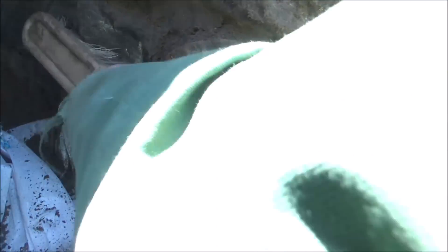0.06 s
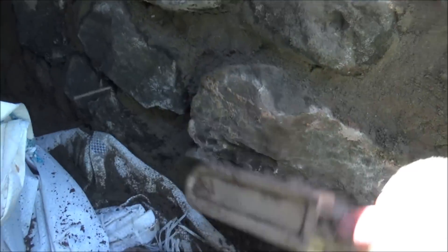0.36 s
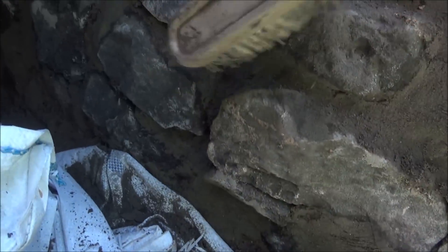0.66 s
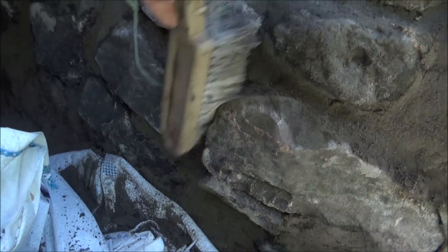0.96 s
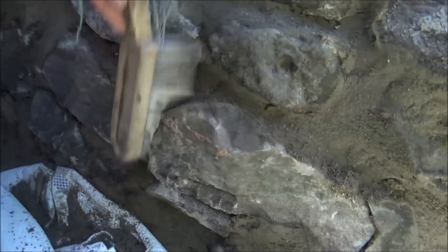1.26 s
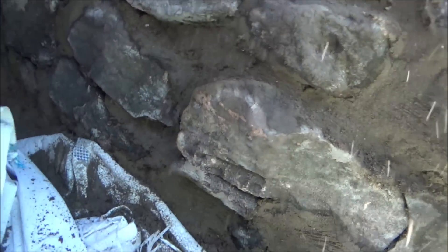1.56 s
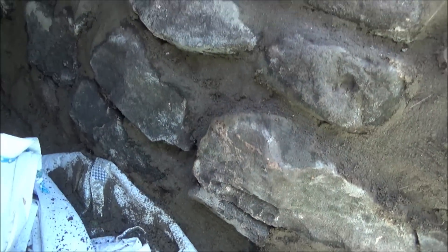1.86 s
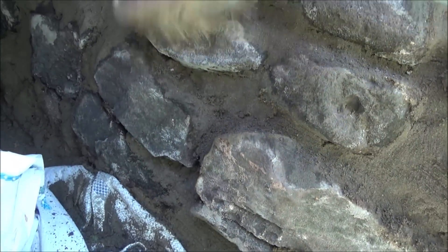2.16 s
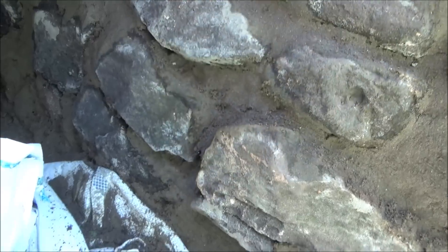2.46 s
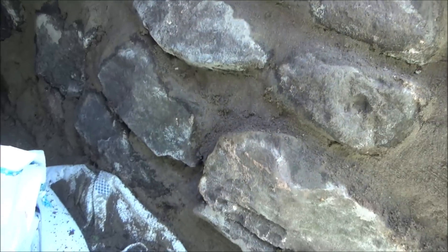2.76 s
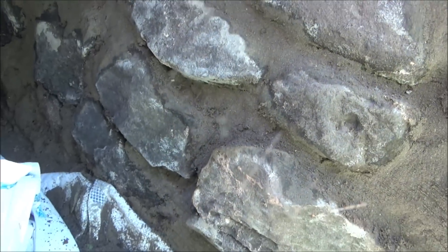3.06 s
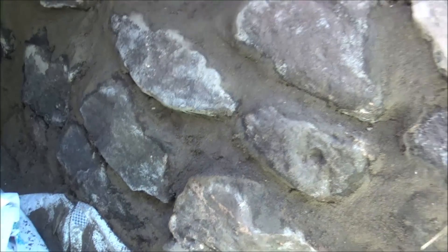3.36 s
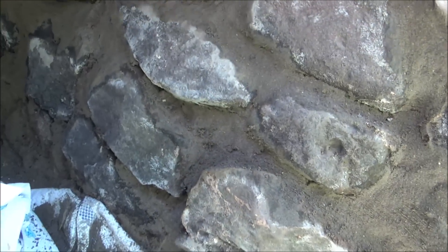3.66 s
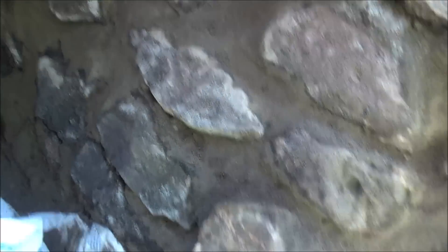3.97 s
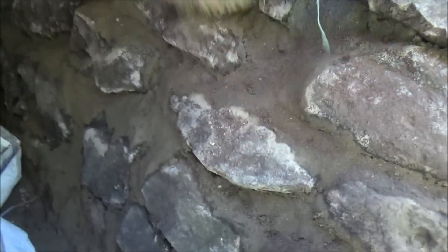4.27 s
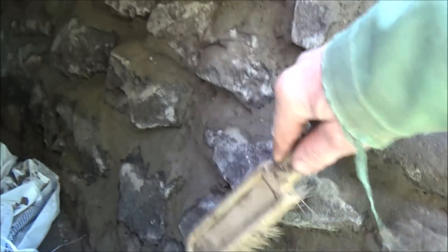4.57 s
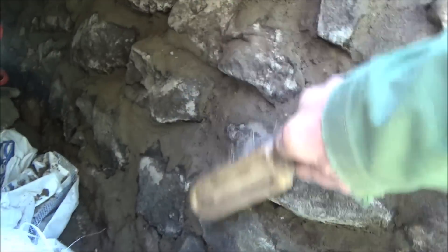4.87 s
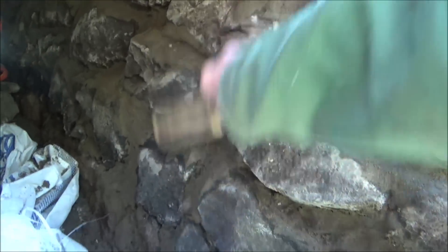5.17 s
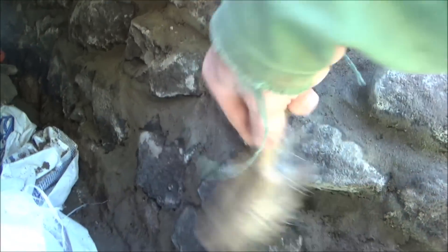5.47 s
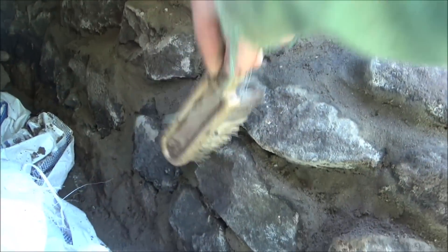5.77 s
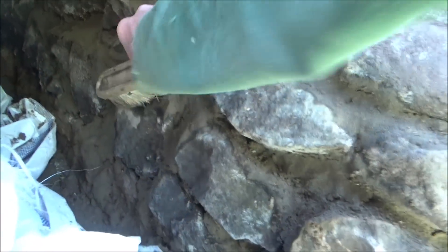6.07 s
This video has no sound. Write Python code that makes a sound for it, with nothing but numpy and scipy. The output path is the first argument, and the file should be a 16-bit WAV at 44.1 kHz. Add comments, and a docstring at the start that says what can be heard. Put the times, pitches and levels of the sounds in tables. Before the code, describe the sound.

A stiff hand brush scrubs wet cement from a stone wall in quick, scratchy strokes, its wooden block knocking on the stones.

```python
"""A stiff hand brush scrubs fresh cement from a stone wall; close walls answer, over a low distant drone.
From the start bristles flick, sand grinds, wet mortar crumbles and the wooden block knocks on stones.
In the first quarter second an arm bumps the microphone and its sleeve rubs across it.
From 0.9 s the tips now and then sing over smooth stone; from 1.4 s mortar squelches and crumbs drop.
The strokes go on to the end, at 6 s."""
import sys
import numpy as np
from scipy import signal
from scipy.fft import rfft, irfft
from scipy.io import wavfile
from scipy.ndimage import uniform_filter1d

SR = 44100
rng = np.random.default_rng(int(sys.argv[2]) if len(sys.argv) > 2 else 0)


def generate_wav(signal):
    """Clip the signal to [-1, 1] and save it as 16-bit WAV at the path in sys.argv[1]."""
    frames = np.transpose(np.atleast_2d(signal))
    scaled = np.clip(frames, -1, 1) * 32767
    pcm = np.round(scaled).astype(np.int16)
    wavfile.write(sys.argv[1], SR, pcm)


N = 269186
TIME = np.arange(N) / SR


def amp(db):
    """Decibels to gain."""
    return 10 ** (np.asarray(db) / 20)


def unit(x):
    """Scale to rms 1."""
    return x / np.sqrt(np.mean(x ** 2))


def add(track, time_s, sound):
    """Mix a sound in at a time."""
    start = max(int(time_s * SR), 0)
    track[start:start + len(sound)] += sound[:N - start]


def walk(rate_hz):
    """Random values joined by straight lines; spread near 1."""
    return np.interp(TIME * rate_hz, np.arange(N), rng.standard_normal(N)) * np.sqrt(3 / 2)


def resonate(x, hz, width_hz):
    """One resonance, gain 1 at its centre."""
    return signal.lfilter(*signal.iirpeak(min(hz, SR / 3), hz / min(width_hz, SR / 4), fs=SR), x)


def colour(x, spectrum, size=1024):
    """Minimum-phase filter through (Hz, dB) points."""
    hz, db = np.transpose(spectrum)
    bins_hz = np.fft.rfftfreq(size, 1 / SR) + 1
    log_gain = np.log(amp(np.interp(np.log(bins_hz), np.log(hz), db)))
    cepstrum = irfft(log_gain)[:size // 2]
    cepstrum[1:] *= 2
    return signal.oaconvolve(x, irfft(np.exp(rfft(cepstrum, size))))[:N]


def ticks(rate_hz, spread_db):
    """Random impacts of uneven size, at even power whatever their rate."""
    size = amp(spread_db * np.minimum(rng.exponential(size=N), 5)) * rng.choice([-1, 1], N)
    return unit((rng.random(N) < rate_hz / SR) * size / np.sqrt(rate_hz))


def grains(rate_hz, spread_db, low_hz, high_hz, q, count=14):
    """Impacts that each ring briefly at one of several pitches."""
    hits, pitch = ticks(rate_hz, spread_db), rng.integers(0, count, N)
    pitches_hz = np.geomspace(low_hz, high_hz, count)
    return sum(resonate(hits * (pitch == k), hz, hz / q) for k, hz in enumerate(pitches_hz))


def pops(rows, decay_cycles, glide, size=4096):
    """Damped rings that swell within a cycle and slide in pitch."""
    out, t = np.zeros(N), np.arange(size) / SR
    for time_s, db, hz in rows:
        turns = hz * t
        fade = np.exp(-turns / decay_cycles)
        phase = 2 * np.pi * turns * (1 + glide * (1 - fade))
        ring = np.sin(phase) * fade * (1 - np.exp(-2 * turns))
        add(out, time_s, amp(db) * ring / np.abs(ring).max())
    return out


def ramp(time_s, length_s):
    """Progress through a gesture, 0 to 1."""
    return np.clip((TIME - time_s) / length_s, 0, 1)


def press(time_s, length_s, attack_s, release_db_per_s):
    """Gain of a gesture: half on at its start, held for its length, then dying away."""
    release = amp(-release_db_per_s * np.clip(TIME - time_s - length_s, 0, 1))
    return ramp(time_s - attack_s / 2, attack_s) * release


# Drone spectrum (frequency [Hz], gain [dB])
DRONE_SPECTRUM = [(20, -20.5), (35, -26), (48, -6), (58, -4.5), (66, 1), (80, -7.5), (105, -12), (122, -6),
                  (150, -12), (250, -19), (500, -25), (1500, -30), (5000, -31), (12000, -52)]


def drone(level_db=-43.5):
    """A low wavering drone from far off, with faint outdoor air above it."""
    rumble = unit(colour(rng.standard_normal(N), DRONE_SPECTRUM, size=8192))
    return rumble * amp(level_db + 1.8 * walk(11))


# Pushes and drags of the brush
# (time [s], length [s], bristle level [dB], swell [dB], sand re bristles [dB], mortar level [dB])
BRUSH_STROKES = [(0.0,0.0077,-23,-4,0,-33.5), (0.047,0.095,-29.5,-4.5,-1.5,-35.5),
                 (0.163,0.065,-29.5,3.5,1,-35), (0.222,0.13,-21,0,1.5,-39), (0.388,0.11,-33,7.5,0,-55),
                 (.498,.29,-39.5,-6.5,1.5,-53), (0.85,0.047,-32,10,-2,-49), (0.901,0.025,-20,5,-5.5,-61),
                 (0.993,0.054,-25,7,-2,-40.5), (1.083,0.11,-28,0,-4.5,-42),
                 (1.234,0.042,-32,-2.5,1.5,-46.5), (1.287,0.22,-25,-6,-6.5,-49), (1.61,.07,-35.5,1,-6,-54),
                 (1.701,0.24,-33,-5.5,-1.5,-46.5), (1.909,0.074,-31.5,-1,1,-41),
                 (2.011,0.044,-35.5,-5,2,-56), (2.062,0.088,-24,5,-5,-46.5), (2.194,0.027,-21,3.5,-16,-51),
                 (2.28,0.11,-24.5,-2,-3,-40), (2.42,0.07,-20.5,5,-5.5,-39.5),
                 (2.535,0.14,-25,-15.5,-11,-46), (2.727,0.056,-21,4,-9,-45.5),
                 (2.811,0.15,-36,6.5,-12,-45.5), (2.937,.072,-23.5,-1.5,-8,-46),
                 (3.017,0.18,-29.5,5,-2,-49), (3.259,0.23,-31,-3,-6.5,-46.5),
                 (3.505,0.069,-22.5,-0.5,-13,-46.5), (3.577,0.12,-28,0,0,-41.5),
                 (3.699,0.16,-33.5,-5,-2.5,-45.5), (3.874,0.15,-26,4.5,-3,-36),
                 (4.039,0.067,-22,3,-16,-37.5), (4.147,0.039,-22.5,-2.5,-8,-42), (4.19,.21,-23,-1,-3.5,-39),
                 (4.431,0.18,-22,2,-16,-48), (4.635,0.068,-26,-2,-4.5,-42), (4.718,0.1,-24.5,-9,-7,-44),
                 (4.836,0.055,-20.5,1.5,-5.5,-48), (4.919,0.036,-22.5,1,-7,-46),
                 (4.986,0.098,-31.5,3,-10,-54), (5.099,0.079,-27.5,-5.5,-9,-48),
                 (5.184,0.051,-22.5,0.5,-8.5,-63), (5.25,0.11,-31,-4,-5,-49),
                 (5.35,0.087,-22.5,-4.5,-20,-48.5), (5.451,0.21,-32,-10.5,-8.5,-48),
                 (5.686,0.093,-41,-8,-15,-73), (5.873,.04,-29,-3,1,-63), (5.912,0.16,-24.5,-5.5,-4.5,-45)]


def strokes(rest_db=-47.5, rest_mortar_db=-54, arch_db=0.76):
    """Bristle, sand and mortar levels in dB: the tufts bend in, run fastest mid-stroke, spring off."""
    # a few tips trail on the wall between strokes
    bristle_power, sand_power, mortar_power = amp([rest_db, rest_db - 7, rest_mortar_db]) ** 2
    for time_s, length_s, db, swell_db, sand_db, mortar_db in BRUSH_STROKES:
        along = ramp(time_s, length_s) - 0.5
        arch = amp(-arch_db * (2 * along) ** 2)
        pressure = press(time_s, length_s, attack_s=0.036, release_db_per_s=340.5) * arch
        stroke = pressure * amp(db + swell_db * along)
        bristle_power += stroke ** 2
        sand_power += (stroke * amp(sand_db)) ** 2
        mortar_power += (pressure * amp(mortar_db)) ** 2
    return 10 * np.log10([bristle_power, sand_power, mortar_power])


def tuft_snaps(speed, settle_s=0.005):
    """Gain flutter as tufts snap free and settle; a fast stroke glides, a slow one catches."""
    snaps = signal.lfilter([1], [1, -np.exp(-1 / (settle_s * SR))], np.abs(ticks(130, spread_db=4)))
    depth = 0.19 * (1 - speed) ** 2 + 0.36
    return (1 + depth * unit(snaps)) / (1 + depth)


# Spectra of bristles, fine grit flung off the tips, and rolling sand (frequency [Hz], gain [dB])
BRISTLE_SPECTRUM = [(500, -22.5), (1500, -10.5), (3000, -4.5), (4200, 0.5), (5200, 2.5), (6300, -1),
                    (7500, -5), (8600, -13), (10000, -25), (12000, -33.5), (16000, -32)]
SPRAY_SPECTRUM = [(5000, -40), (7500, 10.5), (8800, 9.5), (10000, 9.5), (11500, 7.5), (14000, 2),
                  (16000, -5)]
SAND_SPECTRUM = [(300, -21), (800, -7), (1300, -7.5), (2000, 0), (2800, 4), (3800, 1), (6000, -52.5),
                 (12000, -45)]


def scrub(bristle_db, sand_db, full_speed_db=-20):
    """Bristles catch and flick free over rolling sand: single ticks when slow, a dense hiss when fast."""
    speed = np.minimum(amp(bristle_db - full_speed_db), 1)
    flicks = ticks(350 + 20000 * speed ** 1.4, spread_db=1)
    twangs = grains(250 + 3000 * speed, spread_db=2.2, low_hz=2300, high_hz=9000, q=16, count=28)
    bristles = unit(colour(flicks, BRISTLE_SPECTRUM))
    bristles = unit(bristles + 0.46 * unit(colour(twangs, BRISTLE_SPECTRUM)))
    flung = ticks(1500 + 16000 * speed, spread_db=-1.5)
    spray = unit(colour(flicks + 1.25 * flung, SPRAY_SPECTRUM)) * amp(-14.5 + 4 * speed)
    grit = grains(200 + 3500 * speed, spread_db=2, low_hz=900, high_hz=4200, q=5.4, count=16)
    sand = unit(colour(unit(grit) + 0.9 * flicks, SAND_SPECTRUM)) * amp(1.72 * walk(70))
    song = singing_tips()
    duck = 1 / np.sqrt(1 + np.abs(uniform_filter1d(song ** 2, size=1024)))  # singing tips stop scratching
    tips = duck * (amp(0.57) * (bristles + song) + spray)
    return (tips * amp(bristle_db) + sand * amp(sand_db - 2)) * tuft_snaps(speed)


def spatter(bristle_db):
    """Wet crumbs flung off the brush tick against the stones, standing out between strokes."""
    crumbs = unit(grains(110, spread_db=1.6, low_hz=1700, high_hz=6500, q=5))
    return crumbs * amp(0.5 * bristle_db - 25)


# Spectrum of crumbling mortar (frequency [Hz], gain [dB])
MORTAR_SPECTRUM = [(80, -22), (160, -5), (260, -8), (450, -2.5), (680, -1.5), (1000, -8), (1600, -6.5),
                   (4000, -3)]


def mortar(mortar_db, full_dig_db=-33):
    """Soft wet lumps break up under the bristles; deep digging thuds, and the wooden block rings hollow in a
    low mode."""
    breaks = grains(1400, spread_db=5, low_hz=239, high_hz=1390, q=4.5)
    lumps = unit(colour(breaks, MORTAR_SPECTRUM))
    thuds = unit(resonate(resonate(ticks(300, spread_db=1), 170, 200), 180, 330))
    thuds *= amp(1.15 * (mortar_db - full_dig_db) - 2.5)
    hollow = unit(resonate(ticks(900, spread_db=7), 810, 170))
    return (lumps + thuds + amp(-6) * hollow) * amp(mortar_db + 0.5)


# Modes of the wooden block (frequency [Hz], width [Hz], gain [dB])
BLOCK_MODES = [(1900, 1400, -5.5), (2560, 116, 1), (3790, 590, -8.5), (4800, 190, 3.5), (6730, 500, -4)]
# Blows on stone (time [s], relative peak [dB], band centre [Hz], clatter length [s])
BLOCK_KNOCKS = [(.002, -11, 3430, 0.039), (0.4527, -16.5, 3030, 0.015), (0.4756, -25, 2500, 0.021),
                (0.6818, -19, 4200, 0.0042), (0.7186, -17.5, 5530, 0.0046), (0.768, -24.5, 2600, 0.017),
                (.8609, -30, 6000, 0.014), (0.9129, -16, 6000, 0.027), (0.9769, -17, 5500, 0.0068),
                (0.9962, -14, 1900, 0.033), (1.054, -14.5, 1900, 0.017), (1.187, -13, 2680, 0.019),
                (1.2383, -18, 1950, 0.035), (1.726, -9, 4200, 0.015), (1.9179, -17.5, 4400, 0.015),
                (1.977, -16.5, 3360, 0.013), (2.0672, -8, 4240, 0.021), (2.0908, -15, 3000, 0.015),
                (2.2955, -16, 3400, 0.035), (2.4248, -15, 2540, 0.05), (2.8388, -13.5, 3970, 0.016),
                (2.8855, -13.5, 3770, 0.03), (2.939, -14.5, 3770, 0.031), (3.008, -19.5, 2500, 0.023),
                (3.0755, -16.5, 3600, 0.014), (3.092, -24, 3800, 0.016), (3.237, -18.5, 4500, 0.013),
                (3.2806, -15.5, 3100, 0.03), (3.4553, -22, 5000, 0.016), (3.487, -13.5, 5500, 0.0047),
                (3.8196, -19.5, 2600, 0.0077), (3.8804, -15, 3500, 0.023), (4.144, -9, 3650, 0.01),
                (4.201, -15, 1800, 0.017), (4.343, -10, 2090, 0.017), (4.4548, -13.5, 3500, 0.025),
                (4.522, -11.5, 1960, 0.012), (4.535, -13, 2800, 0.013), (4.7316, -13, 2920, 0.021),
                (5.0604, -17.5, 2230, 0.034), (5.104, -13.5, 3670, 0.024), (5.463, -15.5, 3500, 0.026),
                (5.471, -20, 2500, 0.024), (5.641, -27, 4500, 0.0071), (5.655, -23, 3200, 0.0086),
                (5.7159, -29, 4460, 0.0085), (5.723, -23.5, 4800, 0.009), (5.867, -7.5, 4470, 0.0067)]


def knocks(impact_s=0.0037, size=4096):
    """Each blow rings the block and sets off a brief clatter of grit; wet mortar dulls it."""
    out, t = np.zeros(N), np.arange(size) / SR
    dulling = signal.butter(3, 7800, fs=SR, output="sos")
    for time_s, db, hz, length_s in BLOCK_KNOCKS:
        clatter = rng.standard_normal(size) * amp(-40 * (t / length_s) ** 1.4)
        chatter = 5.4 * amp(db) * rng.standard_normal(size) * (t < impact_s)  # wood driven onto stone
        grip = 1 + 0.045 * rng.standard_normal()  # each hold shifts the modes
        wood = sum(amp(mode_db) * resonate(clatter + chatter, mode_hz * grip, width_hz)
                   for mode_hz, width_hz, mode_db in BLOCK_MODES)
        blow = signal.sosfilt(dulling, resonate(clatter + 0.95 * wood, hz, 1.2 * hz) + 0.19 * wood)
        add(out, time_s, amp(db + 1.5) * blow / np.abs(blow).max())
    return out


def walls(x, t60_s, size=8192):
    """Dense, quick reflections from the stones around, duller than the direct sound."""
    t = np.arange(size) / SR
    echoes = rng.standard_normal(size) * amp(-60 * t / t60_s) * (t > 0.001)
    wet = signal.oaconvolve(x, echoes / np.sqrt(np.sum(echoes ** 2)))[:N]
    return colour(wet, [(80, 20), (250, -1.5), (600, -11.5), (2000, 0),
                        (5000, -5), (7500, -9), (11000, -60.5)])


# Bumps on the microphone (time [s], relative peak [dB], pitch [Hz])
ARM_BUMPS = [(.0605, -25, 116), (.0695, -17, 112)]


def arm_bumps():
    """The arm bumps the microphone: low, heavily damped thumps."""
    return pops(ARM_BUMPS, decay_cycles=0.36, glide=-0.075)


# Cuff slides (time [s], length [s], level [dB], start rib rate [Hz], end rib rate [Hz],
# start resonance [Hz], end resonance [Hz])
CUFF_RUBS = [(0.064, 0.052, -29.5, 109.7, 206.5, 171, 514), (0.178, .038, -23, 559, 439, 607, 540)]


def sleeve():
    """The cuff's weave zips over the microphone: uneven slips through a shifting hollow resonance."""
    gain = sum(amp(db) * press(time_s, length_s, attack_s=0.032, release_db_per_s=1000)
               for time_s, length_s, db, *_ in CUFF_RUBS)
    rubs = np.array(CUFF_RUBS)
    edges_s = np.cumsum(rubs[:, :2], axis=1).ravel()
    rib_hz = np.interp(TIME, edges_s, rubs[:, 3:5].ravel())
    body_hz = np.interp(TIME, edges_s, rubs[:, 5:].ravel())
    ribs_passed = np.floor(np.cumsum(rib_hz * (1 + 0.0955 * walk(300))) / SR)
    slips = np.diff(ribs_passed, prepend=0) * np.sqrt(SR / rib_hz) + 0.5 * rng.standard_normal(N)
    body = np.zeros(N)
    for hz in 125 * 2 ** (np.arange(12) / 4):  # crossfaded quarter-octave bands
        nearness = np.maximum(1 - 4 * np.abs(np.log2(body_hz / hz)), 0)
        body += nearness * unit(resonate(resonate(slips, hz, 1.04 * hz), hz, 1.3 * hz))
    rasp = unit(resonate(resonate(slips, 910, 500), 1420, 1100))
    return (body + amp(-3.5) * rasp) * gain


# Glides over smooth stone (centre time [s], length [s], pitch [Hz], level re bristles [dB])
TIP_GLIDES = [(0.902, 0.072, 6340, 0.5), (1.399, 0.084, 6800, -2.5), (1.495, 0.11, 6400, 2),
              (2.136, 0.13, 6400, -0.5), (2.222, 0.014, 6200, 4), (2.488, 0.11, 6500, -6),
              (2.586, 0.19, 6200, 1.5), (2.783, 0.04, 6500, 8), (2.966, 0.12, 6300, -2.5),
              (3.331, 0.087, 6260, -2), (3.55, 0.099, 6540, -7), (4.09, 0.12, 6500, -7),
              (4.751, 0.035, 6300, 4), (5.225, 0.048, 7200, -2), (5.376, 0.041, 7200, -2)]


def singing_tips(width_hz=1450, size=16384):
    """Bristle tips sing in a narrow band while they glide over smooth stone."""
    out, t = np.zeros(N), (np.arange(size) - size / 2) / SR
    for time_s, length_s, hz, db in TIP_GLIDES:
        band = resonate(resonate(rng.standard_normal(size), hz, width_hz), hz, width_hz)
        add(out, time_s + t[0], unit(band) * amp(db) * np.exp(-2 * (t / length_s) ** 2))
    return out


# Squelches and falling crumbs (time [s], relative peak [dB], pitch [Hz])
MORTAR_PLOPS = [(1.355, -26, 1170), (1.476, -26.5, 870), (1.727, -28, 890), (1.85, -29, 586),
                (1.916, -29.5, 590), (2.259, -29, 700), (2.37, -24, 585), (2.385, -26, 660),
                (2.43, -27.5, 720), (2.835, -29, 1040), (3.611, -34, 258), (3.886, -23.5, 900),
                (3.94, -20.5, 704), (3.975, -30, 595), (4.2, -29, 640), (4.305, -25, 600),
                (4.345, -27, 630), (5.462, -26.5, 740), (5.95, -34, 410), (6.073, -30, 590)]


def plops():
    """Wet mortar squelches or a crumb drops: a short ring, rising slightly."""
    return amp(2) * pops(MORTAR_PLOPS, decay_cycles=1.93, glide=0.054)


def scene():
    """Mid/side mix: the work just left of centre, the sleeve rubbing each channel differently."""
    bristle_db, sand_db, mortar_db = strokes()
    work = scrub(bristle_db, sand_db) + spatter(bristle_db) + mortar(mortar_db) + knocks() + plops()
    bumps = arm_bumps()
    mid = work + amp(-12) * walls(work, t60_s=0.049) + sleeve() + bumps + drone()
    side = tuft_scatter(work) + sleeve() + amp(-11) * bumps
    side += amp(-23.5) * resonate(work, 3300, 8300)  # leftward lean
    return np.array([mid + side, mid - side])


# Side-signal spectrum (frequency [Hz], gain [dB])
SIDE_SPECTRUM = [(100, -45), (380, -18), (1200, -12), (4400, -13), (8100, -9), (11000, -39), (15000, -55)]


def tuft_scatter(work):
    """Side signal: each tuft scratches at its own spot, so direction scatters from tick to tick."""
    return colour(work * walk(1500), SIDE_SPECTRUM)


def record(dry, knee=0.52, cutoff_hz=15900):
    """Round the highest peaks, then low-pass."""
    rounded = dry / (1 + (dry / knee) ** 4) ** (1 / 4)
    return signal.sosfilt(signal.ellip(10, 0.2, 80, cutoff_hz, fs=SR, output="sos"), rounded)


dry = scene()
out = record(dry)
generate_wav(out)
```